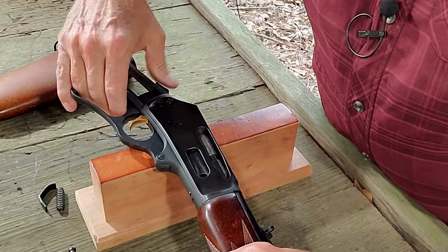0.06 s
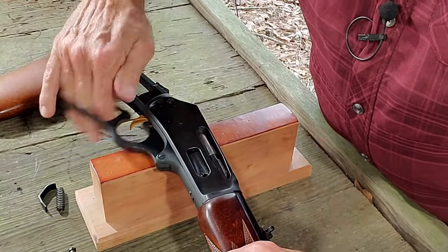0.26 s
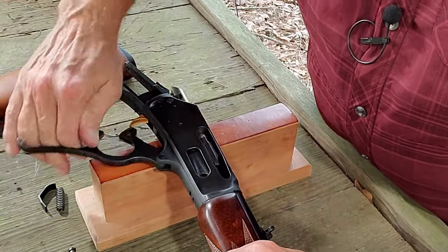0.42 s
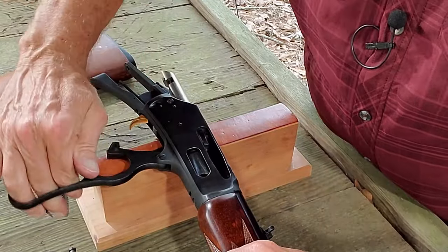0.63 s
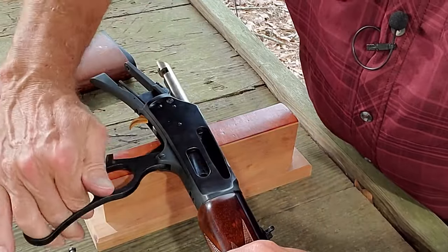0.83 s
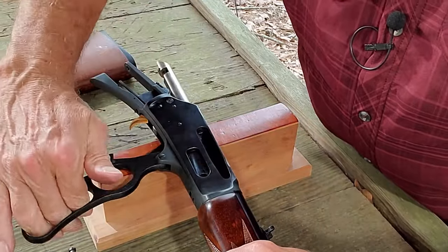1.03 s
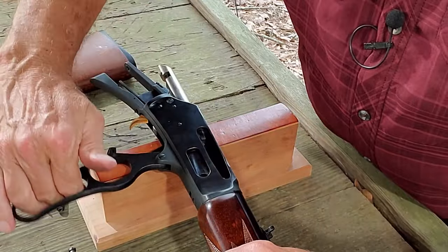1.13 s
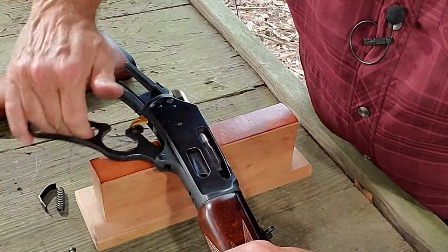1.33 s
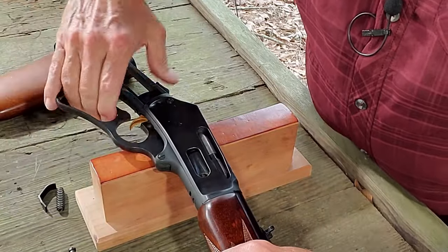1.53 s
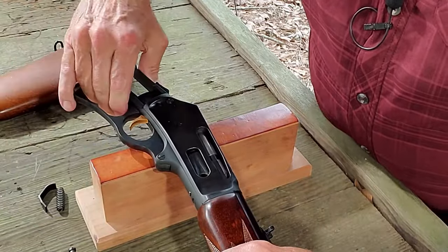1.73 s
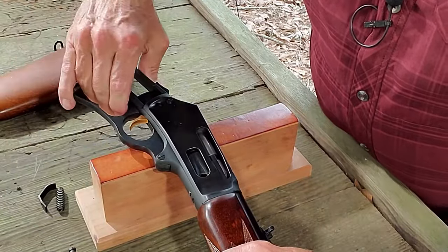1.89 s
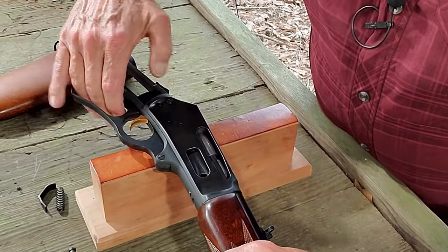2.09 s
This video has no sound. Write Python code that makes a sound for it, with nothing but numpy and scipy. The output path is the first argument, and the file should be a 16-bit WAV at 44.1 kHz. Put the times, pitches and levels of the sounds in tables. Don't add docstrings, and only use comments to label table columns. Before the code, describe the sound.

A lever-action rifle is cycled once, sharp steel clicks and rattles with dull wooden knocks

```python
import sys
import numpy as np
from scipy import signal
from scipy.fft import rfft, irfft
from scipy.io import wavfile
from scipy.ndimage import uniform_filter1d

SR = 44100
rng = np.random.default_rng(int(sys.argv[2]) if len(sys.argv) > 2 else 0)


def to_wav(s):
    ch = np.atleast_2d(s).T
    pcm = np.round(np.clip(ch, -1, 1) * 32767)
    wavfile.write(sys.argv[1], SR, pcm.astype(np.int16))


def field_ratio(decibels):
    return 10 ** (np.asarray(decibels, dtype=float) / 20)


N = 94815

# f/Hz, level/dB
AIR_COLOUR = [(12, -26.5), (20, 3.5), (88, -33.5), (123, -3.5), (182, -37), (301, -20), (446, -24),
              (1000, -36), (16000, -54)]
# f/Hz, width/Hz, level/dB
MACHINE_HUMS = [(131, 58, -78.5), (1020, 300, -79), (1880, 330, -82)]
# t/s, level/dB
BREEZE_LEVEL = [(0, -53), (.1, -57), (.2, -65.5), (.3, -55), (.55, -63), (.7, -53), (.82, -60), (1.0, -68),
                (1.5, -59), (1.7, -60), (2.0, -75), (2.15, -61.5)]
# t/s, scrape level/dB, block groan level/dB, groan f/Hz
BOLT_SLIDE = [(0, -66.5, -68, 382.8), (0.218, -79, -72.5, 330), (0.358, -57, -70.5, 380),
              (0.559, -65, -77, 400), (0.641, -62.5, -67.5, 408.2), (.685, -56, -62, 436.3),
              (.71, -55, -65, 394), (.85, -77.5, -85, 400), (1.02, -70.5, -82, 331),
              (1.099, -48.5, -58.5, 250.2), (1.17, -56.5, -66, 245.3), (1.231, -63, -68.5, 248.6),
              (1.32, -56, -66, 243), (1.371, -63, -65, 247.2), (1.531, -68, -77.5, 300),
              (1.63, -49.5, -70, 300), (1.72, -80.5, -76.5, 300), (2.15, -71, -77, 300)]
# t/s, length/s, f/Hz, level/dB
SQUEAKS = [(.665, .02, 2500, -63), (.66, .032, 4300, -75), (.664, .028, 7550, -72),
           (.666, .026, 12900, -74), (.649, .02, 420, -55), (.674, .028, 424, -44), (.408, .016, 2500, -62),
           (1.145, .02, 1900, -64), (1.195, .045, 440, -56), (1.275, .025, 3100, -71),
           (1.3, .02, 1850, -66), (1.324, .016, 1850, -62), (1.26, .095, 245, -51), (1.12, .07, 250, -52)]
# f/Hz, level/dB, time to fall 60
# dB/s
BLOCK_TONES = [(45, -1.5, 0.047), (125, -7.5, .1), (170, 4.5, 0.058), (253.7, 0.5, .09), (300, 0.5, .07),
               (394.7, 3.5, 0.049), (535, -11, 0.08), (950, -14, .04)]
# t/s, level/dB, f/Hz
BLOCK_KNOCKS = [(.014, -49.5, 374), (.035, -47, 420), (0.255, -30.5, 45), (0.255, -38.5, 300),
                (0.279, -32.5, 404), (.314, -32.5, 403), (.722, -35.5, 320), (.716, -37, 950),
                (1.373, -35.5, 950), (1.605, -36.5, 950), (.745, -44, 129.2), (1.45, -48.5, 150),
                (1.033, -34, 400), (1.094, -36, 323), (1.373, -39.5, 125), (1.374, -31.5, 413),
                (1.391, -37.5, 270), (1.422, -38, 433), (1.562, -34, 244), (1.606, -29.5, 370),
                (1.624, -40, 300), (.314, -42, 950), (1.09, -38, 535), (1.09, -46, 950), (1.61, -40, 535),
                (.04, -52, 535), (.315, -40, 45), (2.144, -44, 170), (.76, -52, 800), (1.65, -46, 170)]
# t/s, level/dB, f/Hz, time to fall 60 dB/s
SINGING_SPRINGS = [(.254, -45, 13910, .1), (.428, -66, 13900, .17), (1.420, -62, 10500, .07),
                   (1.566, -57, 8050, .1), (.2515, -28, 1543, .07), (.2515, -29, 1743, .06),
                   (.278, -42, 1543, .04), (1.565, -42, 1813, .09), (1.373, -40, 1750, .09),
                   (.427, -43, 1780, .06), (1.372, -44, 3100, .04)]
# ratio to its pitch, level/dB, time to fall 60 dB/s
RECEIVER_TONES = [(.8, -13, .02), (1.0, 0, .025), (1.12, -8, .025), (1.42, -10.5, .02), (1.63, -13, .02)]
# t/s, level/dB, bright steel f/Hz, steel share level/dB
SMALL_TICKS = [(.007, -58, 6700, -3), (0.352, -39, 9500, -17), (.377, -47, 12500, -22),
               (.607, -56, 4500, 3), (0.5373, -35, 5500, 6), (0.691, -38, 7000, -11),
               (.699, -42.5, 6060, -13), (1.045, -35.5, 7050, 6), (1.0775, -39, 9000, 21),
               (1.098, -35, 4030, 9), (1.112, -40, 7950, 16), (1.118, -38, 3100, 4),
               (1.131, -42.5, 4830, 3), (1.168, -44, 3300, 0), (1.355, -37, 3950, -6),
               (1.446, -50, 3150, 1), (1.575, -45, 4700, 14), (1.593, -37.5, 5700, 27),
               (1.613, -40, 5900, 7.5), (.308, -42, 3000, -10), (.649, -59, 7300, 3), (.667, -50, 2600, -3),
               (1.31, -59, 8500, 6), (.258, -31, 4800, 3), (.27, -34, 5000, 0), (.73, -36, 6000, 3),
               (.447, -54, 4000, 3), (2.053, -62, 7000, 10)]
# t/s, level/dB, receiver f/Hz, bright steel f/Hz, steel share level/dB
LEVER_OPENING = [(0.0319, -36, 1815, 5060, -15), (0.2374, -30.5, 1663, 8450, 2.5),
                 (.240, -25, 2165, 11050, 7.5), (0.2459, -20, 1732, 5800, -10),
                 (0.2511, -9.5, 1543, 5340, 0), (0.2515, -18, 2500, 8200, 0), (0.2773, -25, 1600, 5630, -8),
                 (0.3112, -24.5, 1790, 4750, -7), (.314, -28, 1860, 4730, -18),
                 (0.4261, -32, 1780, 6000, -12), (0.4345, -34, 1870, 5200, 0),
                 (0.7091, -19, 2250, 9590, 6.5), (0.71, -20, 2150, 5430, -1), (.719, -27, 2240, 4570, 2.5)]
# t/s, level/dB, receiver f/Hz, bright steel f/Hz, steel share level/dB
LEVER_CLOSING = [(1.031, -26, 2300, 4500, -7), (1.0805, -22.5, 1906, 7930, 1.5),
                 (1.084, -27.5, 2200, 12500, 18), (1.086, -30, 2980, 12990, -9),
                 (1.364, -32, 1818, 5070, -6), (1.3692, -22, 1300, 5904, -2),
                 (1.372, -21.5, 1736, 5780, -8.5), (1.4177, -29, 1312, 3200, -1),
                 (1.558, -40, 2000, 3000, -8), (1.563, -22, 1797, 4790, -2.5),
                 (1.6045, -26, 2700, 13000, 0), (1.6042, -16, 1292, 5790, 6), (2.142, -35, 1400, 9400, 7),
                 (2.1465, -25, 1420, 11400, 3)]

STEEL_LOW_HZ, STEEL_TOP_HZ, STEEL_T60_S = 2300, 14500, .012
BRIGHT_DB, BRIGHT_T60_S = 10, .014
STEEL_FOCUS_DB, BLOCK_FOCUS_DB = 6.5, 14.5
CHATTER_S, REBOUND = .0022, .9
TAIL_T60_S, TAIL_BODY_DB, TAIL_STEEL_DB = .086, -16.5, -18


def evened(x):
    return x / np.sqrt(np.mean(x ** 2) + 1e-20)


def read(points, hz):
    f, value = np.transpose(points)
    return np.interp(np.log(hz + 1), np.log(f + 1), value)


def curve(points):
    s, value = np.transpose(points)
    return np.interp(np.arange(N) / SR, s, value)


def add(mix, s, sound):
    part = mix[round(s * SR):][:len(sound)]
    part += sound[:len(part)]


def lowpass(x, hz):
    return signal.lfilter(*signal.butter(2, hz, fs=SR), x)


def resonate(x, hz, width):
    return signal.lfilter(*signal.iirpeak(hz, hz / width, SR), x)


def resonate_twice(x, hz, width):
    return resonate(resonate(x, hz, width), hz, width)


def ring(modes, phases):
    hz, db, t60 = np.transpose(modes)[:, :, None]
    t = np.arange(SR // 8) / SR
    fade = field_ratio(db - 60 * t / np.maximum(t60, .003))
    tones = fade * np.sin(2 * np.pi * (hz * t + phases[:len(modes), None]))
    onset = np.minimum(t / 0.00013, 1)
    return tones.sum(0) * onset / np.sqrt((field_ratio(db) ** 2).sum())


def focused(modes, hz, slope_db):
    return [(f, db - slope_db * abs(np.log2(f / hz)), t60) for f, db, t60 in modes]


def air():
    floor_noise, hum_noise, breeze_noise = rng.standard_normal((3, N))
    colour = field_ratio(read(AIR_COLOUR, np.fft.rfftfreq(N, 1 / SR)))
    floor = irfft(rfft(floor_noise) * colour, N)
    hums = sum(field_ratio(db) * evened(resonate_twice(hum_noise, hz, width)) for hz, width, db in MACHINE_HUMS)
    rumble_band = signal.butter(2, [18, 70], "band", fs=SR, output="sos")
    breeze = evened(signal.sosfilt(rumble_band, breeze_noise))
    return field_ratio(-67) * evened(floor) + hums + field_ratio(curve(BREEZE_LEVEL) + 0.5) * breeze


def slide():
    level_db, groan_db, groan_hz = (curve([(row[0], row[k]) for row in BOLT_SLIDE]) for k in (1, 2, 3))
    push = rng.standard_normal(N)
    happens = rng.random(N) < 7000 / SR
    strength = field_ratio(1.2 * np.minimum(rng.exponential(1, N), 4))
    slips = push * happens * strength

    wood = sum(field_ratio(db) * resonate_twice(slips, hz, 5.7 / t60) * np.sqrt(t60)
               for hz, db, t60 in BLOCK_TONES[1:])
    body = resonate_twice(slips, 1900, 600) + .35 * resonate_twice(slips, 2700, 700)
    flutter = evened(uniform_filter1d(rng.standard_normal(N), size=500))
    hiss = (resonate(slips, 3800, 3500) + .4 * resonate(slips, 9300, 2500)) * field_ratio(1.1 * flutter)

    waver = evened(lowpass(slips, 75))
    groan_turns = np.cumsum(groan_hz * (1 + .015 * waver)) / SR
    groan = field_ratio(groan_db + 2.5 * waver[::-1]) * np.sin(2 * np.pi * groan_turns)
    scrape = field_ratio(-2) * evened(wood) + field_ratio(-14.5) * evened(body) + field_ratio(-18.5) * evened(hiss)
    return field_ratio(level_db) * scrape + groan


def squeak():
    out = np.zeros(N)
    for s, length, hz, db in SQUEAKS:
        wobble, lumps = (evened(uniform_filter1d(v, size=150)) for v in rng.standard_normal((2, SR // 8)))
        t = np.arange(len(wobble)) / SR
        lumps_db = 4 * lumps * min(hz / 2000, 1)
        swell = np.sin(np.pi * np.minimum(t / length, 1)) * field_ratio(db + lumps_db)
        turns = np.cumsum(hz * (1 + .008 * wobble)) / SR
        add(out, s, swell * np.sin(2 * np.pi * turns))
    return out


def block():
    out = np.zeros(N)
    for s, db, hz in BLOCK_KNOCKS:
        sound = ring(focused(BLOCK_TONES, hz, BLOCK_FOCUS_DB), rng.random(14) * 0.2)
        onset = np.minimum(np.arange(len(sound)) / (.003 * SR), 1)
        add(out, s, field_ratio(db + 4.5) * sound * onset)
    return out


def springs():
    out = np.zeros(N)
    t = np.arange(SR // 4) / SR
    for s, db, hz, t60 in SINGING_SPRINGS:
        add(out, s, field_ratio(db - 60 * t / t60) * np.sin(2 * np.pi * hz * t))
    return out


def blow(db, body_hz, steel_hz, steel_db, ring_share=1, body_db=0):
    phases, when, size, place, weight = rng.random((5, 40))
    t = np.arange(SR // 8) / SR
    grit_noise, tail_noise, lump_noise = rng.standard_normal((3, len(t)))
    grit = resonate(grit_noise, steel_hz, 9000)

    receiver = [(ratio * body_hz, d, t60 * ring_share) for ratio, d, t60 in RECEIVER_TONES]
    body = field_ratio(body_db) * ring(receiver, phases * 0) * np.minimum(t / .0012, 1)

    steps = (np.arange(1, len(place)) - place[1:]) / (len(place) - 1)
    steel_tones = STEEL_LOW_HZ * (STEEL_TOP_HZ / STEEL_LOW_HZ) ** steps
    modes = [(steel_hz, BRIGHT_DB, BRIGHT_T60_S * ring_share)]
    modes += [(f, 11 * (w - .5), STEEL_T60_S * ring_share * (.5 + w)) for f, w in zip(steel_tones, weight)]
    crack = grit * field_ratio(-3 - 40000 * t)
    steel = ring(focused(modes, steel_hz, STEEL_FOCUS_DB), phases) + crack

    contacts = np.zeros(SR // 40)
    contacts[0] = 1
    rebounds = (size[:5] - .5) * 2 * REBOUND * (1 - when[:5] / 2)
    np.add.at(contacts, (CHATTER_S * SR * when[:5]).astype(int), rebounds)
    chatter = signal.fftconvolve(steel, contacts)[:len(t)]
    hit = body + field_ratio(steel_db) * chatter

    lumps_db = 3.5 * evened(uniform_filter1d(lump_noise, size=90))
    fade = field_ratio(lumps_db - 60 * t / TAIL_T60_S) * np.minimum(t / .003, 1)
    body_rattle = evened(resonate(tail_noise, body_hz, 1300) + resonate(tail_noise, body_hz, 290))
    steel_rattle = lowpass(grit, 7000)
    tail = field_ratio(TAIL_BODY_DB) * body_rattle + field_ratio(TAIL_STEEL_DB + steel_db) * steel_rattle
    return field_ratio(db) * (hit / abs(hit).max() + fade * tail / max(1, field_ratio(steel_db)))


def ticks():
    out = np.zeros(N)
    for s, db, steel_hz, steel_db in SMALL_TICKS:
        add(out, s, blow(db - 4.5, 2276, steel_hz, steel_db, ring_share=.45, body_db=-7))
    return out


def lever():
    out = np.zeros(N)
    for s, db, *colour in LEVER_OPENING + LEVER_CLOSING:
        add(out, s, blow(db - 2, *colour))
    return out


def scene():
    return (lever() + ticks() + springs() + block() + slide() + squeak() + air())[None]


def top_cut(x):
    return signal.sosfilt(signal.butter(12, 16640, fs=SR, output="sos"), x)


def record(dry):
    mic_top = signal.butter(10, 15700, fs=SR, output="sos")
    return top_cut(signal.sosfilt(mic_top, dry))


dry = scene()
out = record(dry)
to_wav(out)
```